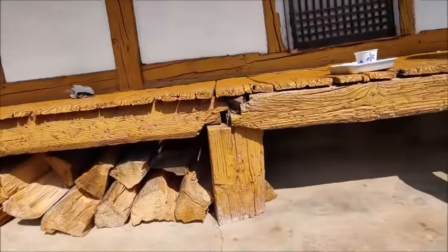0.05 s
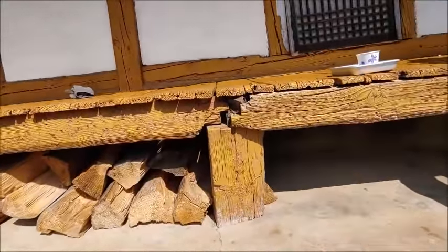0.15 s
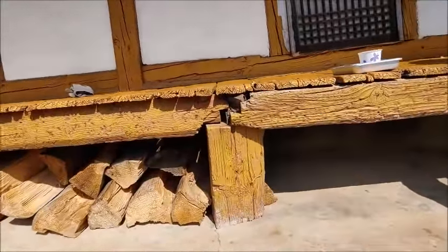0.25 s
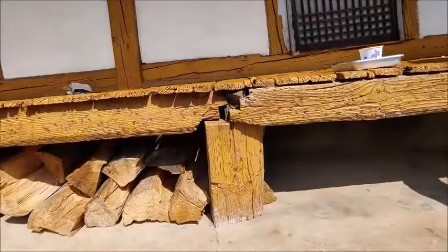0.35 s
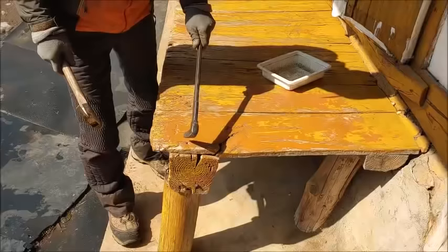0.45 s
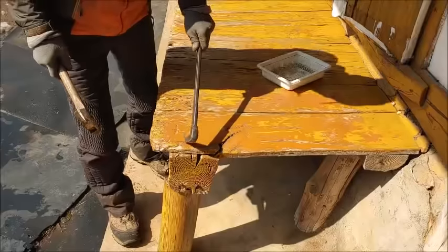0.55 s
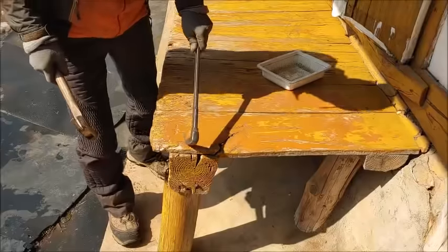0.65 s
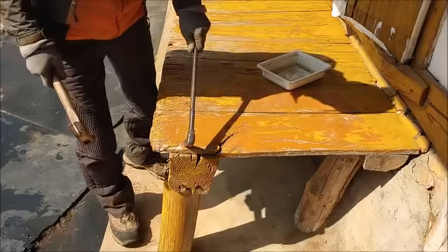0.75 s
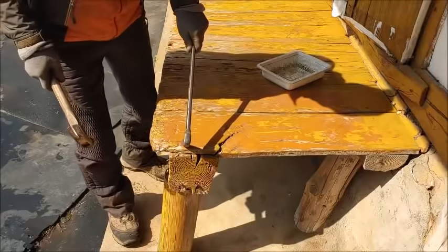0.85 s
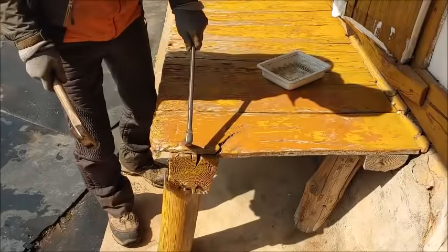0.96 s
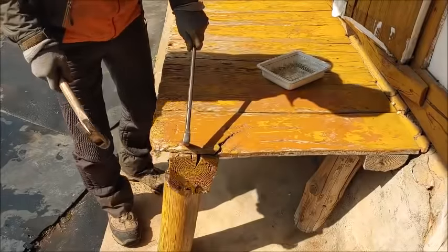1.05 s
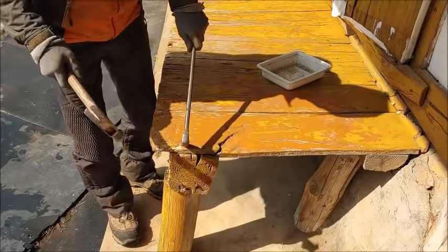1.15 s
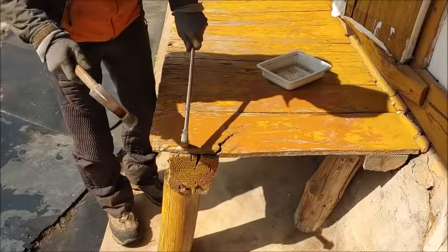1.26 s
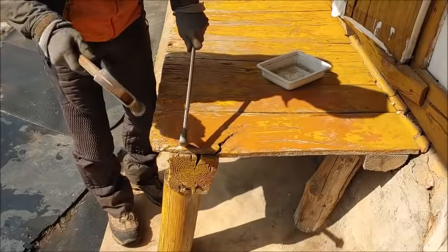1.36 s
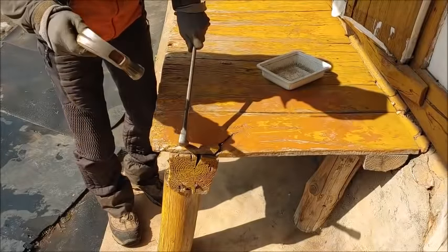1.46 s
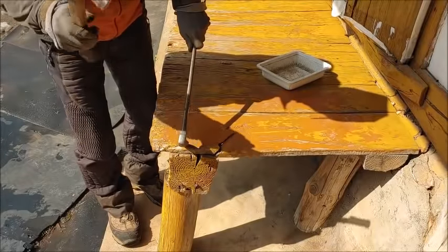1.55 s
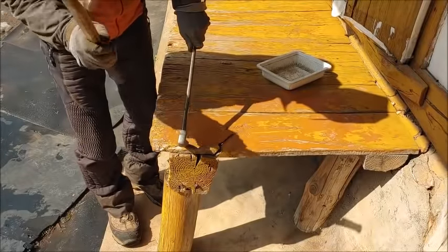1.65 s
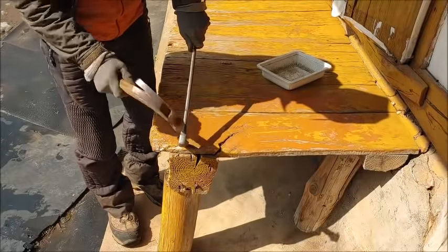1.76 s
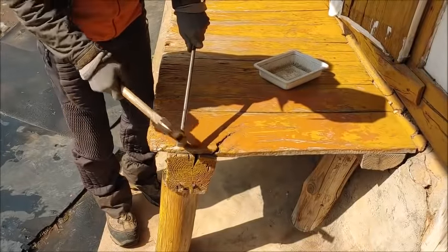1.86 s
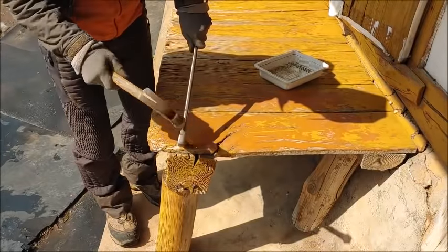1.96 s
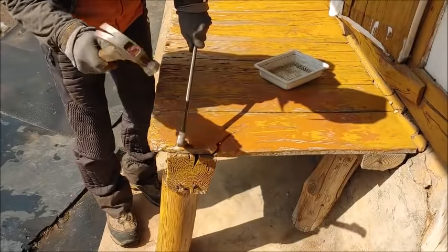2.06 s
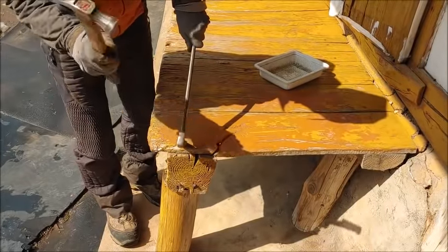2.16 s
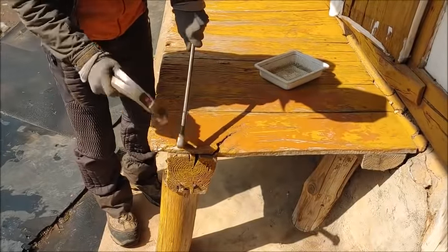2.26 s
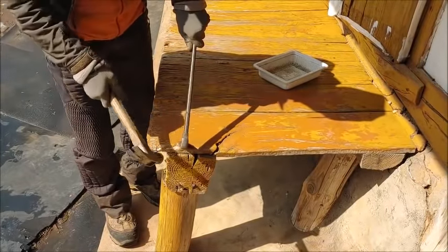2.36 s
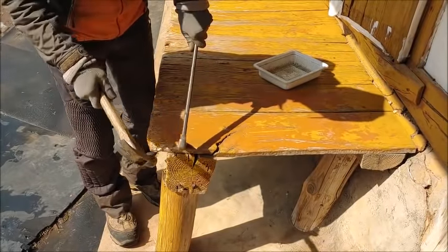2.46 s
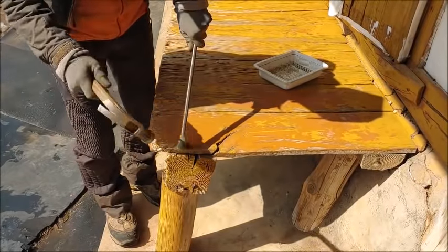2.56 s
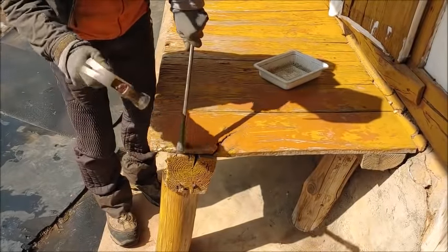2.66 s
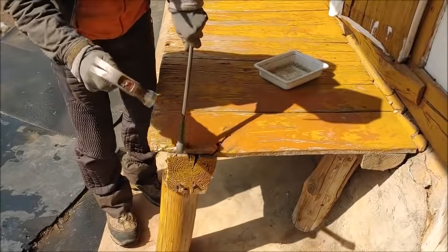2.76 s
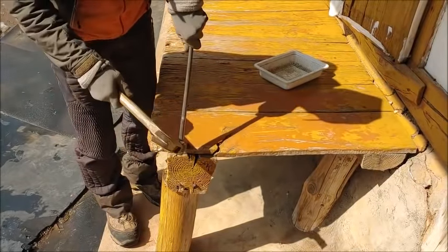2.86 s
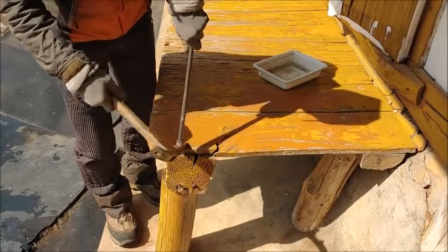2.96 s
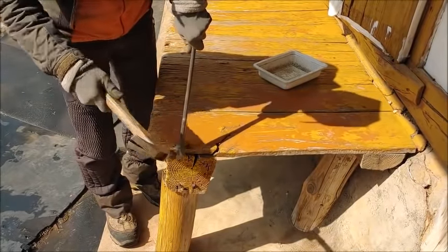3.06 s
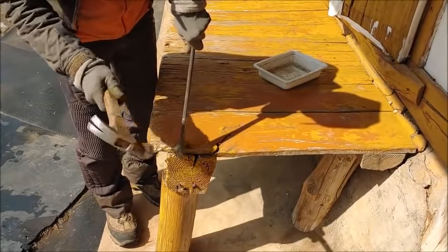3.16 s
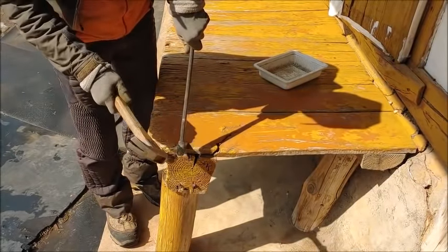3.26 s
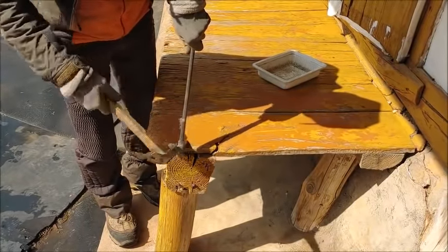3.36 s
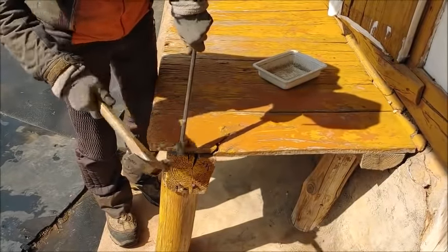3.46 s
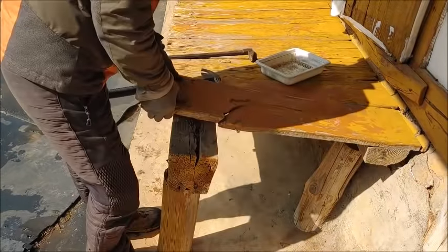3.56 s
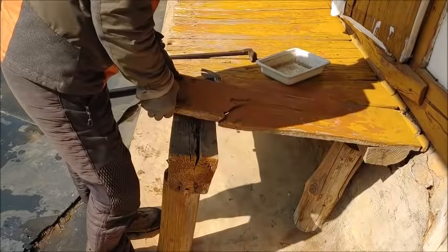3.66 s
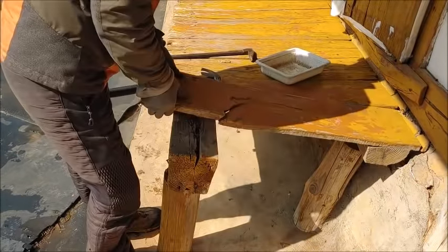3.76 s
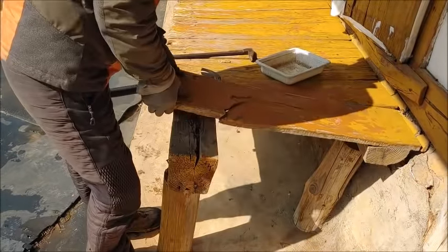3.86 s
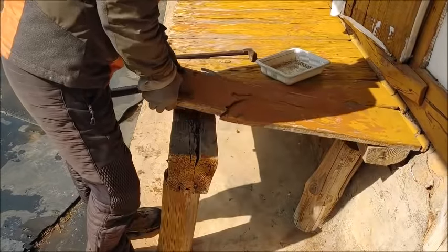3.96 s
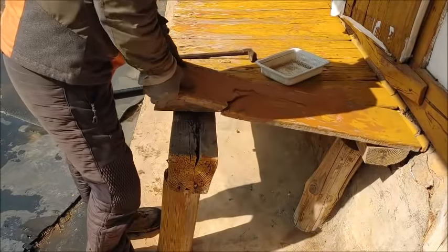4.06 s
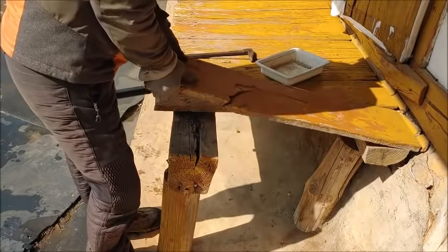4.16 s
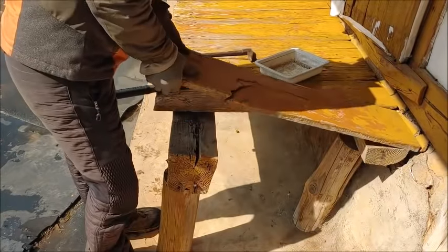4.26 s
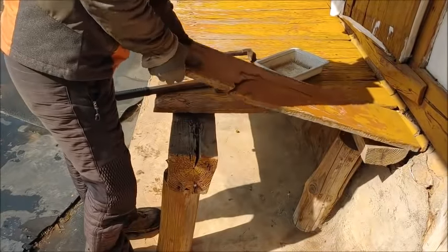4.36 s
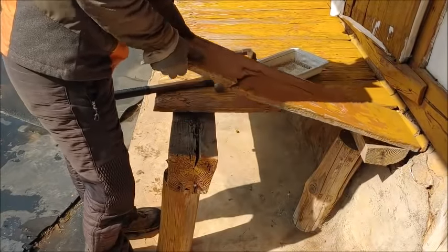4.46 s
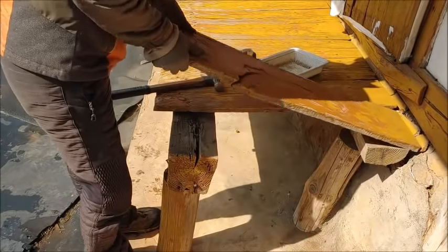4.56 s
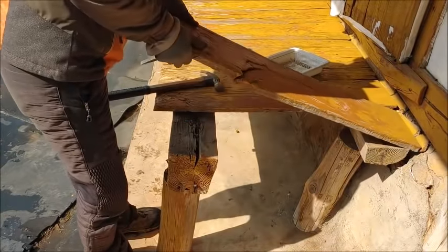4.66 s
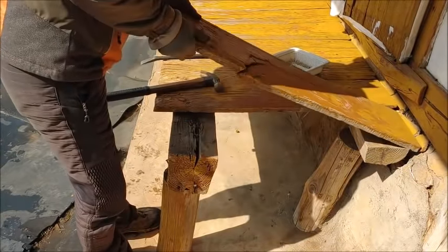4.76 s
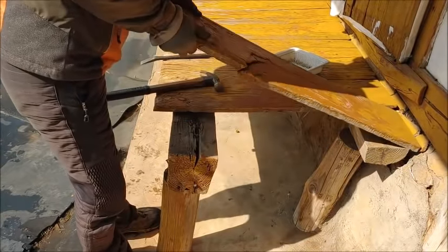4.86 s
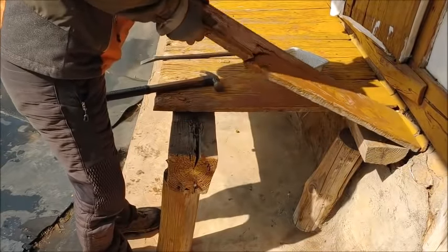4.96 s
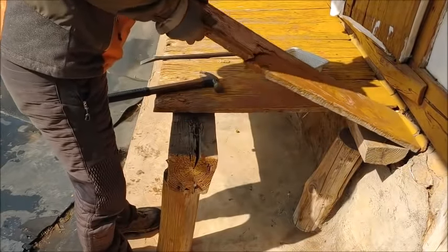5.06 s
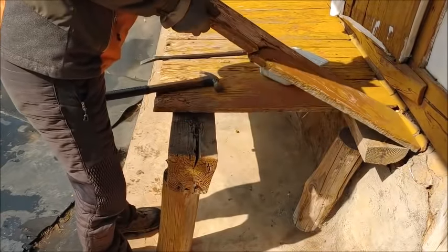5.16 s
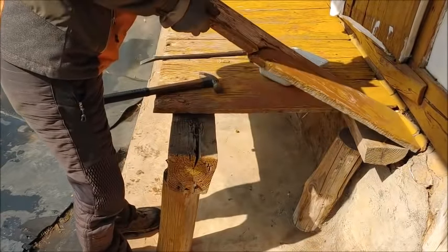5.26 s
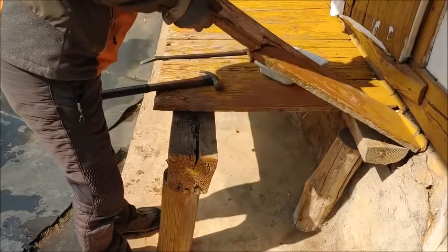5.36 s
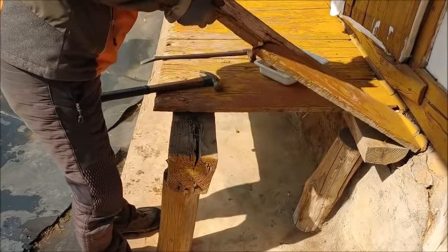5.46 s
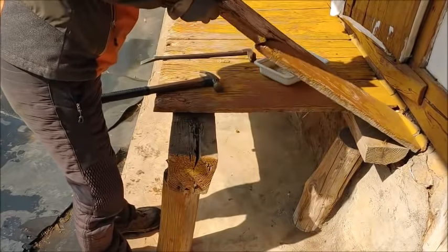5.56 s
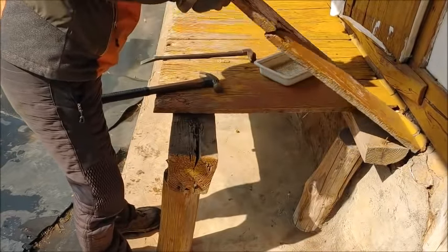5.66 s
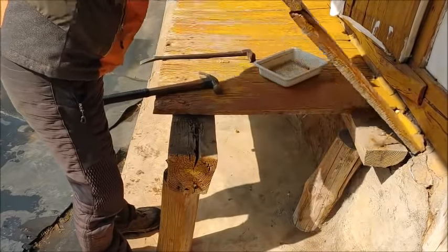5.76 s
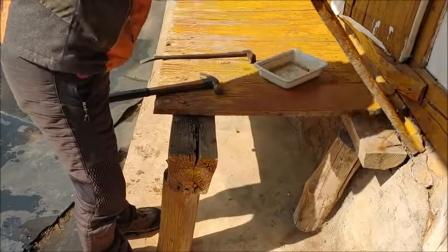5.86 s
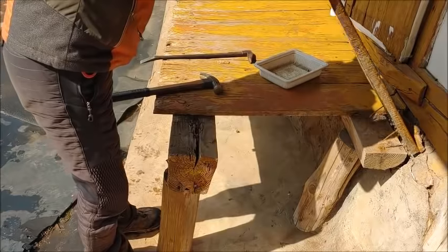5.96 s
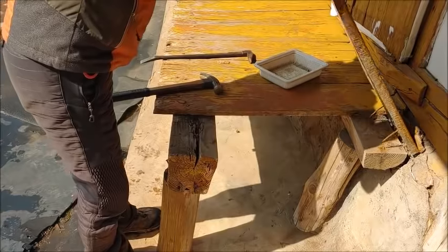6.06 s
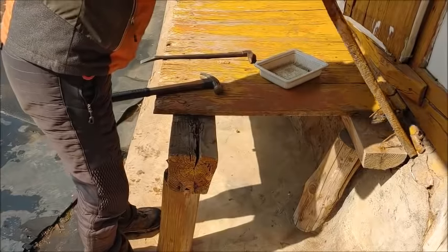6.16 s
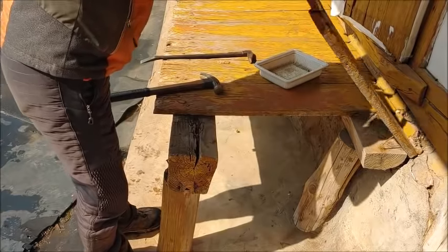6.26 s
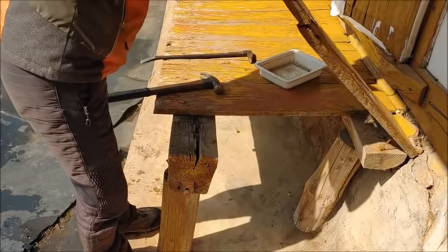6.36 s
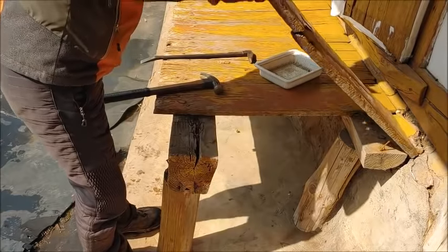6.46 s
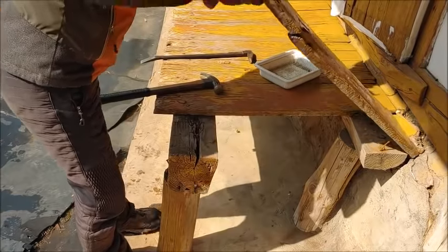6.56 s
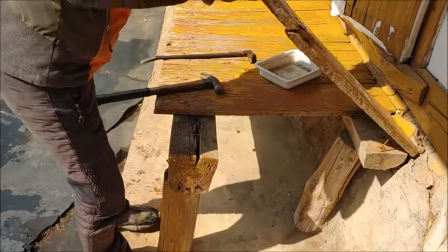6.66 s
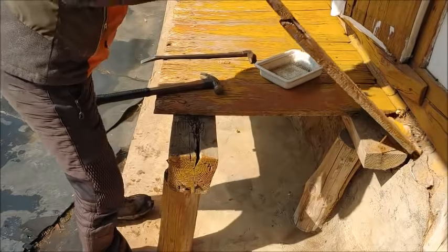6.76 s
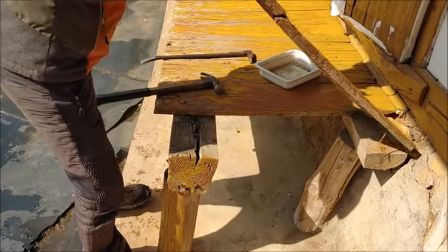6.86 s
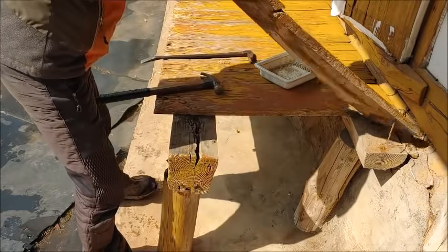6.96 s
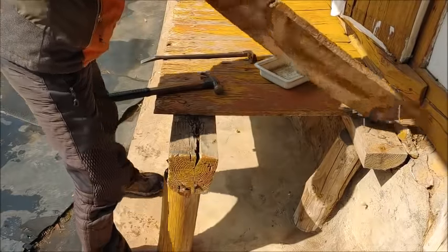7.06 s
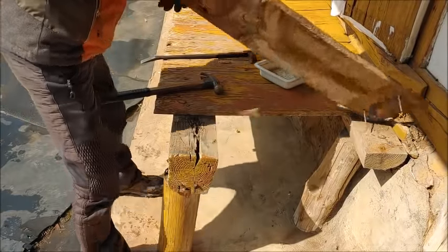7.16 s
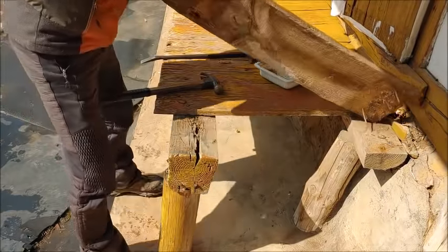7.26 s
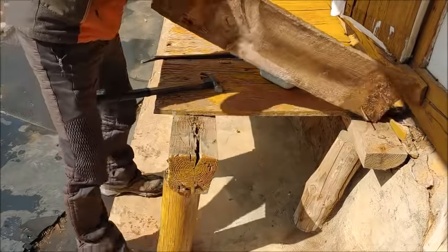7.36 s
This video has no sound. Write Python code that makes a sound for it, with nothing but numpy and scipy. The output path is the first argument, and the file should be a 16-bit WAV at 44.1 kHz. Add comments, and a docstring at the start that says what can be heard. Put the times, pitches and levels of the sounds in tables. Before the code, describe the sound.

Close stereo sound on a sunny wooden porch outdoors. A boot shuffles and boards tick quietly, then a hammer hits a steel pry bar four times, loud, bright and ringing, with low thuds and a little wind rumble. The last ring is cut off abruptly. After a brief hush, a plank is wrenched by hand: groans, hollow knocks, sharp splintering cracks and falling grit, fading to small rustles and ticks.

```python
"""A boot shuffles on a wooden porch outdoors, then a hammer strikes a steel pry bar four times.
A cut to the next scene ends the last ring; a plank is wrenched off its nails by hand: it groans,
knocks, splinters and drops grit. Damped sinusoidal modes make bar and plank; third-octave noise
makes clang, splinters, grit and hush. Low noise is the thud of the shaken porch and a light wind
rumbling on two microphone ports."""
import sys
import numpy as np
from scipy import signal
from scipy.fft import rfft, irfft, next_fast_len
from scipy.io import wavfile

SR = 44100
rng = np.random.default_rng(int(sys.argv[2]) if len(sys.argv) > 2 else 0)


def put_to_file(sound):
    """Save the sound as 16-bit audio at rate SR, in the file named by the first command-line argument."""
    columns = np.atleast_2d(sound).T  # one column per channel
    safe = np.clip(columns, -1, 1)
    whole_steps = np.round(safe * 32767)
    wavfile.write(sys.argv[1], SR, whole_steps.astype(np.int16))


N = 326781

# hammer blows on the bar: t/s, relative level/dB, delay until the tail sinks/s, late swell/dB
BLOWS = [(1.891, 2, 0.28, 15.5), (2.403, 1, 0.27, 14.5), (2.974, 1, 0.27, 14), (3.393, 1.5, 0.42, 6)]
# correlation of the sound at the left and right port: f/Hz, likeness (1 = identical)
LIKENESS = [(60, .4), (130, .9), (290, 0.99), (640, 0.52), (1400, 0.59), (3000, 0.028)]
SCENE_CUT_S = 3.594   # the cut to the next scene ends the fourth blow here
EDGES = 90 * 2 ** np.arange(0, 7.6, 1 / 3)   # third-octave band edges, Hz
CENTRES = np.sqrt(EDGES[1:] * EDGES[:-1])
CONTROL_STEP = 32   # samples between computed effort levels


def amp(db):
    """Decibel law: level in dB to amplitude gain (twice the dB gives power)."""
    return 10 ** (np.asarray(db) / 20)


def rms_one(x):
    """Normalization of mean power: scale to rms 1."""
    return x / np.sqrt(np.mean(x ** 2) + 1e-20)


def in_time(rows):
    """Linear interpolation: the columns of a curve, one value a sample."""
    s, *columns = np.transpose(rows)
    return [np.interp(np.arange(N) / SR, s, c) for c in columns]


def at_hz(points, hz):
    """Interpolation of a table on a log-frequency axis, as pitch is heard."""
    return np.interp(np.log(hz), np.log(np.array(points)[:, 0]), np.array(points)[:, 1])


def shares(spectrum):
    """Spectral density times bandwidth gives power: the share of each band, summing to 1."""
    power = amp(2 * at_hz(spectrum, CENTRES)) * CENTRES
    return (power / power.sum())[:, None]


def dying(samples, t60):
    """Exponential decay: power that falls 60 dB in t60, at least 4 ms."""
    return amp(-120 * np.arange(samples) / SR / np.maximum(t60, .004))


def burst(samples, length_s):
    """Gaussian envelope: power that holds for a while and then stops quickly."""
    return np.exp(-(np.arange(samples) / SR / max(length_s, .004)) ** 2)


def ring(force, hz, t60):
    """Damped resonator: a unit click sets a sine of height 1 ringing, for a t60 of at least 5 ms."""
    r = amp(-60 / (max(t60, .005) * SR))
    w = 2 * np.pi * hz / SR
    return signal.lfilter([0, np.sin(w)], [1, -2 * r * np.cos(w), r * r], force + 1e-18)


def grains(per_s, spread_db):
    """Random point process: clicks of very uneven size, scaled to rms 1."""
    sizes = amp(spread_db * np.minimum(rng.exponential(1, N), 5)) * rng.choice([-1, 1], N)
    return rms_one(sizes * (rng.random(N) < per_s / SR))


def crackle(per_s):
    """Shot noise: power of tiny uneven bursts, each decaying 60 dB in 15 ms, mean 1."""
    bursts = signal.lfilter([1], [1, -amp(-120 / (.015 * SR))], grains(per_s, 3.0) ** 2)
    return bursts / bursts.mean()


def port_phase(hz):
    """Correlation as phase: the angle between the ports whose cosine is the likeness, either way round."""
    return np.arccos(np.clip(at_hz(LIKENESS, hz), 0, 1)) * rng.choice([-1, 1])


def ridged_noise():
    """Coloured noise: four noises share one spectrum with random narrow ridges."""
    ridge_depth_db, ridge_spacing_hz = 6.0, 70
    size = next_fast_len(N)
    hz = np.fft.rfftfreq(size, 1 / SR)
    ridges = np.interp(hz / ridge_spacing_hz, np.arange(800), rng.standard_normal(800))
    spectra = rfft(rng.standard_normal((2, 2, N)), size) * amp(ridge_depth_db * ridges)
    return rms_one(irfft(spectra, size)[..., :N])


def sound_bands(power):
    """Partial coherence: third-octave noise, its mid and side mixed to the likeness of the ports."""
    # level difference of the ports: f/Hz, left minus right/dB
    tilt = [(60, -1.5), (180, -2.5), (550, 1), (1650, -1), (4970, 1), (15000, -6.5)]
    out, noise = np.zeros((2, N)), ridged_noise()
    for k, hz in enumerate(CENTRES):
        band = signal.butter(2, EDGES[k:k + 2], "band", fs=SR, output="sos")
        scale = np.sqrt(SR / 4 / (EDGES[k + 1] - EDGES[k]))
        mid, side = signal.sosfilt(band, noise[k % 2]) * scale   # neighbouring bands use different noise
        alike = np.clip(at_hz(LIKENESS, hz), 0, 1)
        ports = amp(at_hz(tilt, hz) * np.array([[.5], [-.5]]))
        stereo = np.sqrt(1 + alike) * mid + np.sqrt(1 - alike) * side * [[1], [-1]]
        out += np.sqrt(power[k]) * ports * stereo
    return out


def swell(start_s, hold_s, level_db, layer):
    """Exponential attack and release: power that rises, holds and falls at the pace of its layer."""
    # one rate each for flexing, rubbing, grit, thud: rise/(dB/s), then fall/(dB/s)
    rise_rates = [650, 420, 420, 260]
    fall_rates = [360, 300, 260, 140]
    t = np.arange(0, N, CONTROL_STEP) / SR
    before = rise_rates[layer] * np.maximum(start_s - t, 0)
    after = fall_rates[layer] * np.maximum(t - start_s - hold_s, 0)
    return amp(2 * (level_db - before - after))


def effort():
    """Incoherent addition of power: levels in dB of flexing, rubbing, grit and thud."""
    # shuffles and heaves on the wood: start t/s, hold/s,
    # plank flexing level/dB, wood rubbing level/dB, grit level/dB, thud level/dB
    heaves = [(0.26, 0.012, -80, -67, -57.5, -58), (0.626, 0.027, -31.5, -55, -66, -47),
              (0.831, 0.038, -40.5, -52, -86, -47), (1.012, 0.018, -36, -62, -66, -43),
              (1.076, 0.012, -39, -57, -72, -61), (1.194, 0.0073, -34, -41.5, -60, -40.5),
              (1.354, 0.0039, -64, -63, -56.5, -51), (3.737, 0.027, -75, -90, -65, -40.5),
              (4.082, 0.064, -19, -30.5, -43, -39), (4.273, 0.017, -16.5, -18, -43, -34),
              (4.419, 0.023, -25.5, -33, -36, -58), (4.555, 0.072, -35.5, -38.5, -50.5, -42),
              (4.693, 0.028, -30, -33.5, -50.5, -31), (4.85, 0.032, -19.5, -23, -51.5, -41),
              (4.996, 0.11, -36.5, -29.5, -39, -56), (5.193, 0.17, -33, -28.5, -40.5, -55),
              (5.438, 0.2, -32.5, -35.5, -62, -57), (5.71, 0.018, -36, -59, -56, -62),
              (5.745, 0.18, -30, -29.5, -39.5, -41), (5.898, 0.035, -32, -52, -62, -42.5),
              (6.04, 0.016, -60, -72, -58.5, -56), (6.291, .04, -30, -77, -57.5, -56.5),
              (6.409, 0.037, -56.5, -74, -56.5, -64), (6.517, 0.022, -82, -75, -61, -67),
              (6.675, 0.093, -77, -78.5, -49.5, -57), (6.789, 0.026, -71, -49.5, -60, -68),
              (6.89, 0.045, -41.5, -66, -57.5, -33), (6.999, 0.014, -39.5, -68.5, -70.5, -56),
              (7.213, 0.045, -51, -80, -67.5, -42), (7.316, 0.014, -81, -61.5, -55, -49)]
    # quiet rustle between the heaves: t/s, wood rubbing level/dB, grit level/dB
    rustle = [(0, -70, -63), (.2, -65.5, -68.5), (.33, -59, -58.5), (.522, -60.5, -54.5), (.535, -63, -85),
              (1.5, -76, -79), (3.6, -77, -71.5), (3.92, -99, -71), (4.4, -57.5, -71), (5.6, -43.5, -57.5),
              (6.2, -79, -81), (6.6, -83.5, -70), (7.41, -84.5, -78)]
    thud_late_s, blow_thud_db = 0.034, -37   # the porch answers late; its level relative to a blow
    coarse = np.zeros((4, len(range(0, N, CONTROL_STEP))))
    for s, hold_s, *levels_db in heaves:
        for layer, level_db in enumerate(levels_db):
            coarse[layer] += swell(s + thud_late_s * (layer == 3), max(hold_s, 0), level_db, layer)
    for s, db, *_ in BLOWS:
        coarse[3] += swell(s + thud_late_s, 0, db + blow_thud_db, layer=3)
    power = np.array([np.interp(np.arange(N) / CONTROL_STEP, np.arange(len(p)), p) for p in coarse])
    power[1:3] += amp(2 * np.array(in_time(rustle)))
    return 10 * np.log10(power + 1e-10)


def hush():
    """Stationary noise: the constant band power of the quiet background."""
    # background spectrum: f/Hz, relative density level/dB per Hz
    hush_spectrum = [(59, -28), (100, 0.5), (166, -22), (308, -35.5), (570, -5), (2580, -17), (4290, -33.5),
                     (6020, -32), (7770, -25), (16000, -60)]
    return amp(2 * -74.5) * shares(hush_spectrum)


def grit(grit_db):
    """Granular impacts: power of falling grit and scraping, tiny bursts over a smooth hiss."""
    # grit spectrum: f/Hz, relative density level/dB per Hz
    grit_spectrum = [(880, -26), (1500, -4.5), (2080, -3.5), (2720, -2.5), (4830, -8.5), (7760, 0),
                     (9470, -10.5), (11100, -46), (12100, -30.5), (16000, -58)]
    return amp(2 * grit_db) * (1.8 + 1.0 * crackle(280.0)) * shares(grit_spectrum)


def plank(flex_db, rub_db):
    """Modal excitation: stick-slip clicks, soft knocks and the rattle after each drive the modes of the wood."""
    # modes of the plank, the first two its bending: f/Hz,
    # level nailed down/dB, level lifted/dB, level held upright/dB, t60/s
    plank_modes = [(148, -14, -6.5, -7, .09), (167, -9.5, -3, -5.5, 0.04), (237.4, -13, -9, -13.5, 0.12),
                   (335, 0, -4, -4, 0.046), (425.8, -9, -5, -14.5, 0.12), (519, -1.5, -5, 1.5, 0.049),
                   (592.4, -5.5, 0, 2, 0.038), (697, -7.5, 1, -1, 0.025), (802, -8.5, -11, -0.5, 0.073),
                   (911, -14.5, -8, -1, 0.041), (1136, -14, -7.5, 1.5, 0.025),
                   (1342, -19.5, -10, 3.5, 0.04), (1536, -10.5, -20, -5, 0.0043),
                   (1806, -26.5, -10.5, 0, 0.024), (2430, -24, -13.5, -25.5, 0.011)]
    # knocks of wood on wood: t/s, strength/dB, nominal contact/ms
    wood_knocks = [(0.362, -30.5, 0.081), (0.628, -31, 0.7), (0.813, -36, 0.55), (0.861, -30, 0.39),
                   (1.008, -34, 1.1), (1.08, -39, 0.52), (1.196, -35, 0.24), (4.091, -18.5, 0.17),
                   (4.122, -22, 0.81), (4.247, -15.5, 0.53), (4.286, -19.5, 0.15), (4.34, -19, 0.4),
                   (4.457, -23, 0.51), (4.631, -21.5, 0.25), (4.706, -25.5, 0.17), (4.74, -29.5, 0.71),
                   (4.813, -29, 0.22), (4.838, -21, 0.64), (5.127, -22, 0.29), (5.352, -27, 0.45),
                   (5.527, -23, 0.34), (5.564, -22, 0.4), (5.797, -14.5, 0.27), (5.847, -14, 0.16),
                   (6.286, -44.5, 0.46), (6.33, -24.5, 0.16), (6.368, -36.5, 0.4), (6.646, -57.5, 0.49),
                   (6.788, -32, 0.4), (6.874, -44, 0.4), (6.905, -28, 0.3), (7.235, -59, 0.4)]
    # rattle after a knock, one value each nailed down, lifted, upright: level re the knock/dB, then length/s
    rattle_levels = [-36, -25.5, -27.5]
    rattle_lengths = [0.024, 0.029, 0.029]
    stage_starts_s = [3.6, 6.2]   # lifted, held upright
    stage = np.searchsorted(stage_starts_s, np.arange(N) / SR)

    knocks, rattle, ms = np.zeros(N), np.zeros(N + 9000), np.arange(200) / SR * 1000
    for s, db, contact_ms in wood_knocks:
        i = round(s * SR)
        held = np.searchsorted(stage_starts_s, s)
        push = ms * np.exp(-ms / np.clip(contact_ms / 4, .01, .8))   # softer contact lasts longer
        knocks[i:i + 200] += amp(db) * push / push.sum()
        rattle[i:][:9000] += amp(db + rattle_levels[held]) * np.sqrt(burst(9000, rattle_lengths[held]))
    knocks += rattle[:N] * grains(180., 3.0)   # every bounce strikes all modes at once

    flex, rub, hit = np.zeros(N), np.zeros((2, N)), np.zeros((2, N))
    for k, (hz, *levels_db, t60) in enumerate(plank_modes):
        slips = grains(300., 3.9)
        gain = amp(levels_db)[stage]
        rung = gain * ring(slips, hz, t60)
        knocked = gain * ring(knocks * (-1) ** k, hz, t60)
        lag = round(port_phase(hz) / (2 * np.pi * hz) * SR)   # a mode reaches the two ports out of step
        hit += [knocked, np.roll(knocked, lag)]
        if k < 2:
            flex += rung
        else:
            rub += [rung, np.roll(rung, lag)]
    wood = amp(flex_db) * rms_one(flex) + amp(rub_db) * rms_one(rub) + hit
    # the wood is kept above about 105 Hz
    return signal.sosfilt(signal.butter(2, 105, "high", fs=SR, output="sos"), wood)


def wind(thud_db):
    """Weakly correlated low noise, largely its own at each port: wind, and the thud of the shaken porch."""
    # wind rumble: t/s, level/dB
    wind_levels = [(0, -71), (.45, -69.5), (.7, -64), (1.5, -53), (1.76, -64.5), (2.05, -37), (2.22, -48.5),
                   (2.3, -37), (2.57, -45.5), (2.66, -35.5), (2.92, -52.5), (3.16, -43), (3.3, -58),
                   (3.6, -51.5), (5.1, -57.5), (5.7, -71), (6.5, -70.5), (7.41, -67.5)]
    shared, left, right = rng.standard_normal((3, N))
    band = signal.butter(2, [28, 85], "band", fs=SR, output="sos")
    level = np.hypot(amp(in_time(wind_levels)[0]), amp(thud_db))
    return level * rms_one(signal.sosfilt(band, [left + .6 * shared, right + 0.15 * shared]))


def splinters():
    """Brittle fracture: band power of a sharp snap, tearing fibres and a faint echo for each splinter."""
    # splinters and nail slips: t/s, level/dB, tearing length/s, thickness as gain of the low part/dB
    cracks = [(0.0984, -34.5, 0.023, -25.5), (0.3604, -63.5, 0.034, 25), (0.6283, -42, 0.015, -0.5),
              (0.8125, -80.5, 0.021, 30), (0.858, -78, 0.035, 23), (1.003, -48, 0.046, 6.5),
              (1.1872, -45.5, 0.019, 12.5), (1.346, -50, 0.024, 8), (4.0884, -25, 0.017, -3),
              (4.1105, -30, 0.017, 10), (4.2303, -38.5, 0.03, -6), (4.247, -33, 0.028, 7.5),
              (4.2634, -30, 0.042, 6), (4.345, -45.5, 0.018, 7), (4.4356, -18.5, 0.014, 0),
              (4.6352, -34, 0.052, 9.5), (4.814, -52, 0.037, 14), (4.8413, -45.5, 0.041, 18),
              (4.9729, -10.5, 0.048, 6), (4.9915, -10, 0.031, 4.5), (5.0066, -10.5, 0.014, 2),
              (5.02, -15.5, 0.037, 10), (5.199, -16, 0.12, -15), (5.221, -6, 0.036, -2),
              (5.2437, -12.5, 0.024, 3.5), (5.2623, -17.5, 0.036, 11.5), (5.429, -32.5, 0.019, 7),
              (5.56, -61, 0.016, 22), (5.7263, -27, 0.029, -2.5), (5.7663, -16.5, 0.036, 2),
              (5.788, -21.5, 0.058, 6.5), (5.8066, -17.5, 0.02, 0.5), (5.851, -19.5, 0.031, -7),
              (5.884, -22.5, 0.012, 1), (6.328, -41, 0.011, -1), (6.5261, -43.5, 0.049, -10),
              (7.2408, -32, 0.013, -26), (7.3153, -32, 0.0083, 3.5), (7.3786, -51.5, 0.013, 10)]
    # snap spectrum: f/Hz, relative density level/dB per Hz
    snap_spectrum = [(180, -55), (300, -26), (762, -9), (961, -5), (1360, -7.5), (3350, -3), (5340, -1),
                     (6620, -9.5), (8220, 0.5), (11300, -45), (16000, -36)]
    snap_db, snap_s = 6, .0035   # burst() lengthens the snap to 4 ms
    tear_db, echo_db, echo_t60_s = -5, -33, 0.43   # the echo is relative to the tearing
    middle_share = 0.55   # share of the thickness gain heard from 3.2 to 6.4 kHz
    power = np.zeros((len(CENTRES), N))
    fibres = .5 + .5 * crackle(270.0)   # fibres part one by one
    for s, db, tear_s, low_db in cracks:
        i = round(s * SR)
        n = min(round(.3 * SR), N - i)
        # thick splinters sound lower
        body_db = np.select([CENTRES < 3200, CENTRES < 6400], [low_db, middle_share * low_db])
        body = amp(2 * body_db)[:, None]
        snap = amp(snap_db) * burst(n, snap_s)   # here 6 dB is an amplitude gain applied to power
        tearing = fibres[i:i + n] * burst(n, tear_s)
        echo = amp(echo_db) * dying(n, echo_t60_s)   # likewise
        crack = snap + amp(2 * tear_db) * (tearing + echo)
        power[:, i:i + n] += amp(2 * db) * shares(snap_spectrum) * body * crack
    return power


def blow_span(s):
    """Truncated decay: first sample and length of a blow, 0.6 s unless the scene cut ends it."""
    i = round(s * SR)
    return i, min(round(.6 * SR), round(SCENE_CUT_S * SR) - i)


def sinking(samples, after_s, swell_db):
    """Amplitude modulation: the tail of a blow drops by a step, then swells back for a moment."""
    sink_db, sink_s = -10.5, 0.0085
    swell_late_s, swell_s = 0.16, 0.12   # delay after the sinking, half-width
    since = np.arange(samples) / SR - after_s
    drop_db = sink_db * np.clip(since / sink_s, 0, 1)
    return amp(drop_db + swell_db * np.exp(-((since - swell_late_s) / swell_s) ** 2))


def clang():
    """Statistical mode overlap: band power of each blow's dense high modes and its echo in the yard."""
    # clang spectrum: f/Hz, relative density level/dB per Hz
    clang_spectrum = [(59, -46), (100, -8), (283, -7), (406, -14), (872, -6.5), (1550, -10), (2630, -9),
                      (4980, -6.5), (6560, -2.5), (8110, -5), (12100, -18), (15000, -26.5), (16000, -50)]
    # decay of the clang: f/Hz, t60/s
    clang_decay = [(100, 0.22), (400, 0.57), (1500, 0.12), (5000, 0.23), (9000, 0.13), (15000, 0.15)]
    # decay of the yard: f/Hz, t60/s
    yard_decay = [(100, 1), (400, 0.5), (1500, 0.59), (5000, 0.67), (9000, 0.32), (15000, 0.73)]
    clang_db, yard_db = -7.5, -23.5   # relative to the blow
    power = np.zeros((len(CENTRES), N))
    for s, db, after_s, swell_db in BLOWS:
        i, n = blow_span(s)
        near = amp(2 * clang_db) * dying(n, at_hz(clang_decay, CENTRES)[:, None])
        far = amp(2 * yard_db) * dying(n, at_hz(yard_decay, CENTRES)[:, None])
        tail = sinking(n, after_s, swell_db) ** 2
        power[:, i:i + n] += amp(2 * db) * shares(clang_spectrum) * (near + far) * tail
    return power


def wobble(samples, hz):
    """Narrow-band modulation: a mode rattling on the nail has a complex gain that wanders over 200 points."""
    chatter = .045   # points per cycle of the mode, on top of 20 points per second
    re, im = rng.standard_normal((2, 200))
    points = np.arange(200) * SR / (20 + chatter * hz)
    return np.interp(np.arange(samples), points, .2 + re + 1j * im)


def bar():
    """Modal superposition: each blow strikes every mode, heard at each port with its own strength and phase."""
    # modes of the steel bar and the beam under it: f/Hz, relative level loose/dB, biting/dB, seated/dB, t60/s
    bar_modes = [(291, -19.5, -30, -35.5, 0.89), (366, -15.5, -22, -16, .9), (864, -39, -16.5, -30.5, .2),
                 (2250, -24, -28.5, -24.5, 0.71), (3480, -35, -23, -18, 0.93),
                 (4050, -31.5, -42.5, -39, 0.35), (4470, -25, -31.5, -25.5, 0.12),
                 (4870, -15.5, -16.5, -30, 0.68), (5100, -12, -18.5, -9.5, .7),
                 (5635, -16.5, -4.5, -27.5, 0.73), (6000, -21.5, -16, -21.5, 0.73),
                 (7010, -7.5, -5, -25.5, 0.49), (8080, -24, -23.5, -15, 0.66),
                 (7840, -13.5, -10, -8.5, 0.49), (7300, -25.5, -14.5, -9, .3),
                 (8370, -15.5, -7.5, -5, 0.44), (8220, -3.5, -26.5, -20, 0.56), (9060, -8, -16, -15, 0.32),
                 (9100, -26.5, -22, -16.5, .25), (10000, -27.5, -17, -22.5, 0.09)]
    # seating of the bar at each blow: state (0 loose, 1 biting, 2 seated)
    seatings = [0, 1, 2, 2]
    bar_db = -8
    first_t60_s, ring_share = 0.17, 0.27   # first decay, and the amplitude share that rings with the mode's t60
    out = np.zeros((2, N))
    for (s, db, after_s, swell_db), seating in zip(BLOWS, seatings):
        i, n = blow_span(s)
        t = np.arange(n) / SR
        for hz, *levels_db, t60 in bar_modes:
            apart = port_phase(hz)
            ports = amp(rng.normal(0, 1.7, (2, 1))) * np.exp(1j * apart * np.array([[.5], [-.5]]))
            decay = np.sqrt(dying(n, first_t60_s)) + ring_share * np.sqrt(dying(n, t60))
            tone = wobble(n, hz) * np.exp(2j * np.pi * hz * t) * decay * sinking(n, after_s, swell_db)
            out[:, i:i + n] += amp(db + bar_db + levels_db[seating]) * np.imag(ports * tone)
    return out


def scene():
    """Linear superposition: all sources at the two ports."""
    flex_db, rub_db, grit_db, thud_db = effort()
    power = hush() + grit(grit_db)
    power += splinters()
    power += clang()
    return sound_bands(power) + bar() + plank(flex_db, rub_db) + wind(thud_db)


def record(dry):
    """Resonance and saturation: the ports resonate in the treble, peaks are rounded off, the top is cut."""
    port_hz, port_width_hz, port_gain = 7615, 2400, 1.1
    cutoff_hz = 16400   # 60 dB down from here up
    b, a = signal.iirpeak(port_hz, port_hz / port_width_hz, fs=SR)
    heard = dry + port_gain * signal.lfilter(b, a, dry)
    rounded = 0.85 * np.tanh(heard / 1.09)
    return signal.sosfilt(signal.cheby2(12, 60, cutoff_hz, fs=SR, output="sos"), rounded)


dry = scene()
out = record(dry)
put_to_file(out)
```